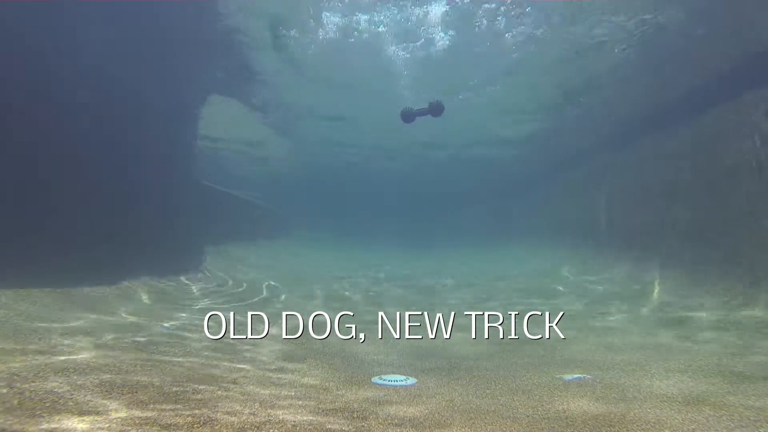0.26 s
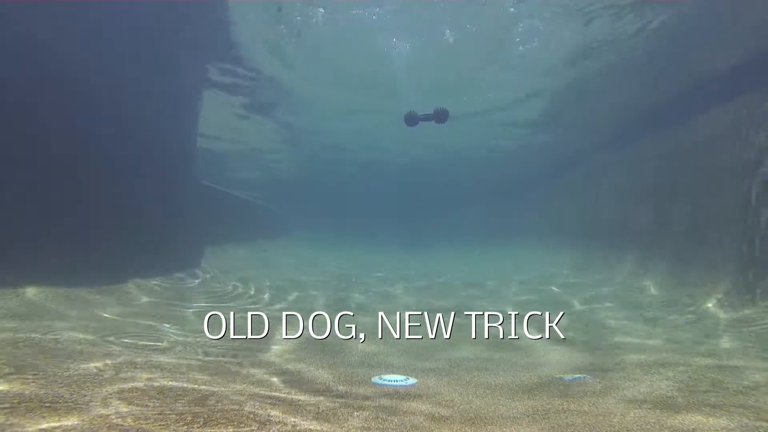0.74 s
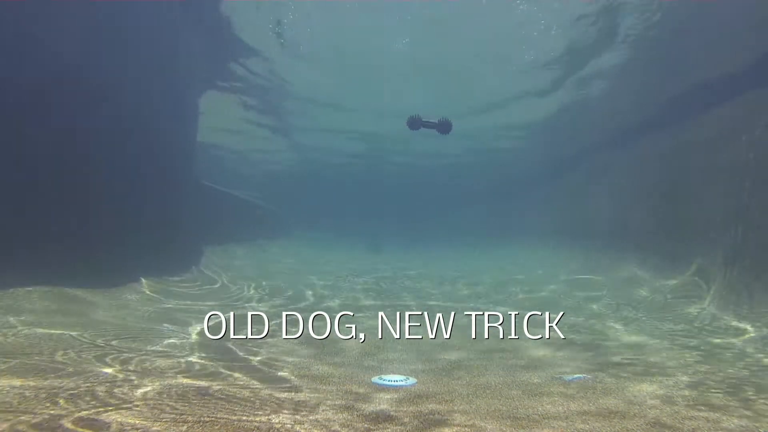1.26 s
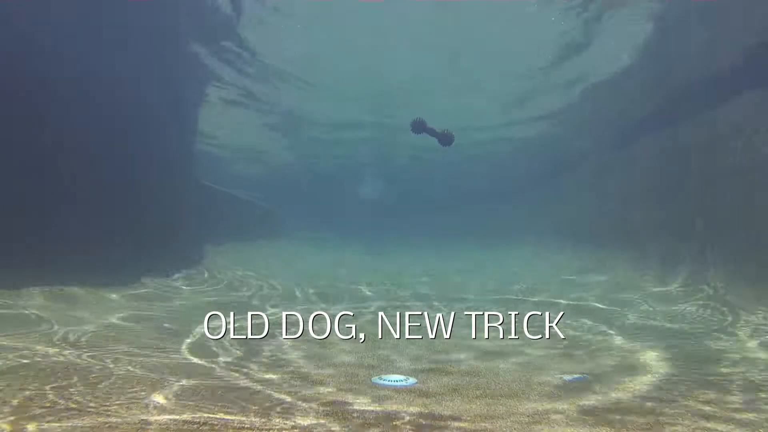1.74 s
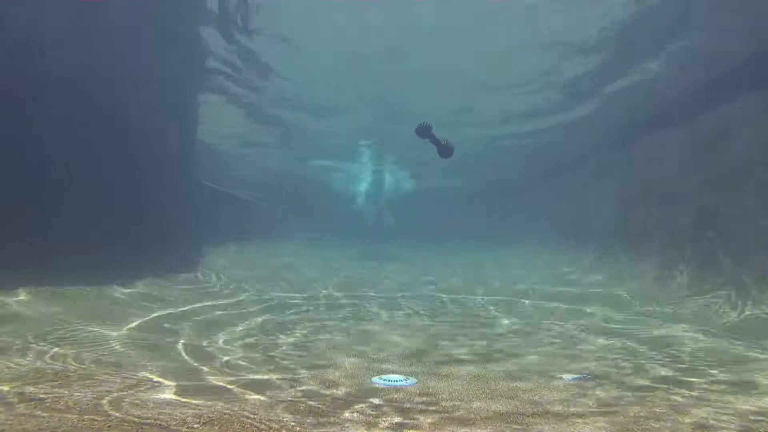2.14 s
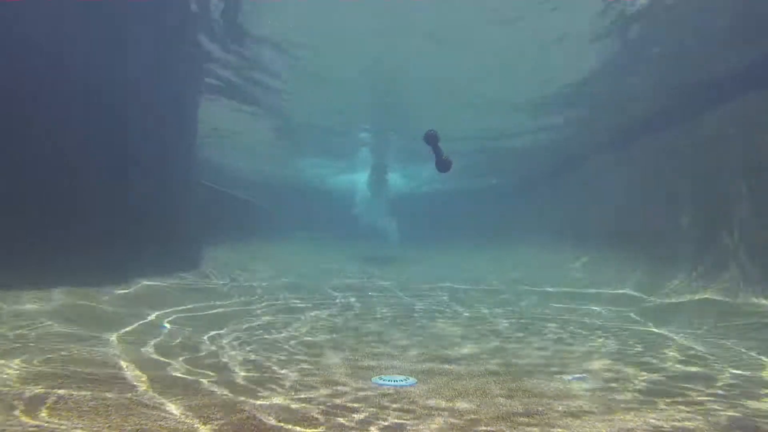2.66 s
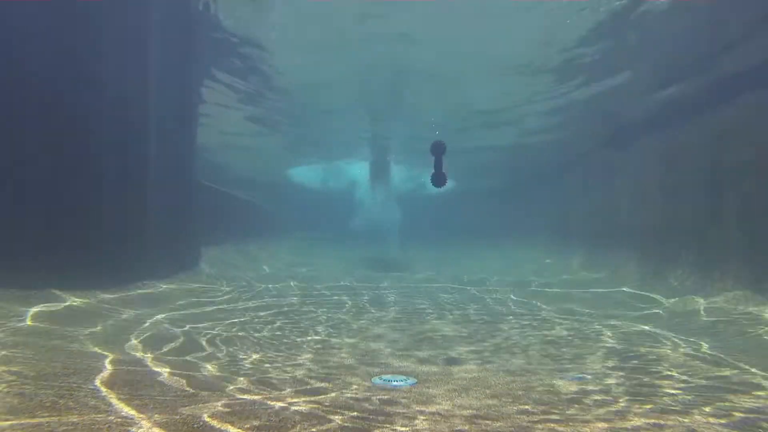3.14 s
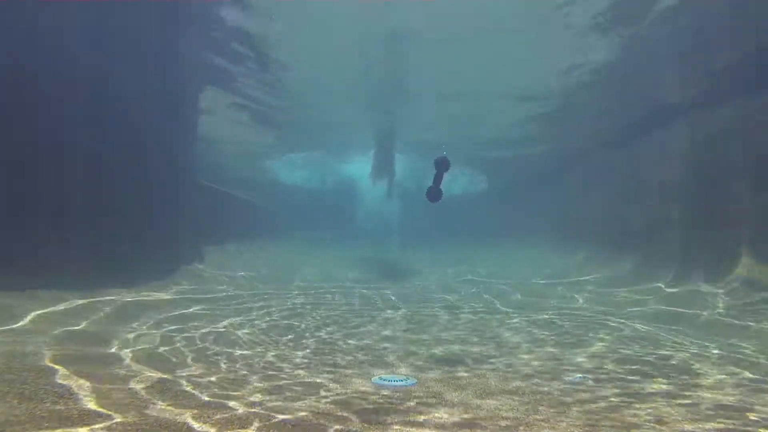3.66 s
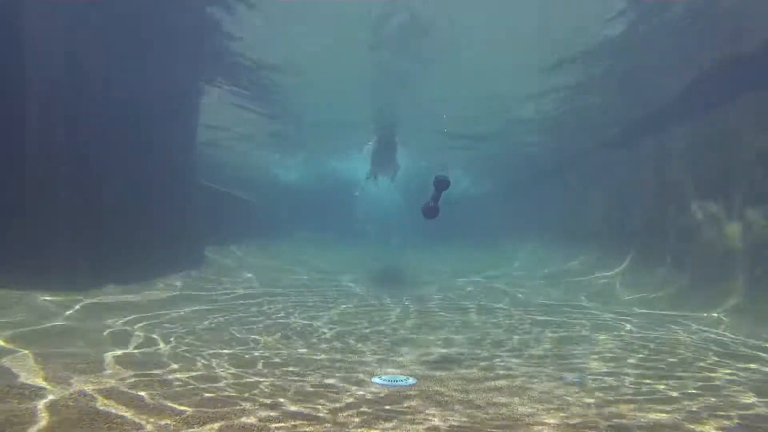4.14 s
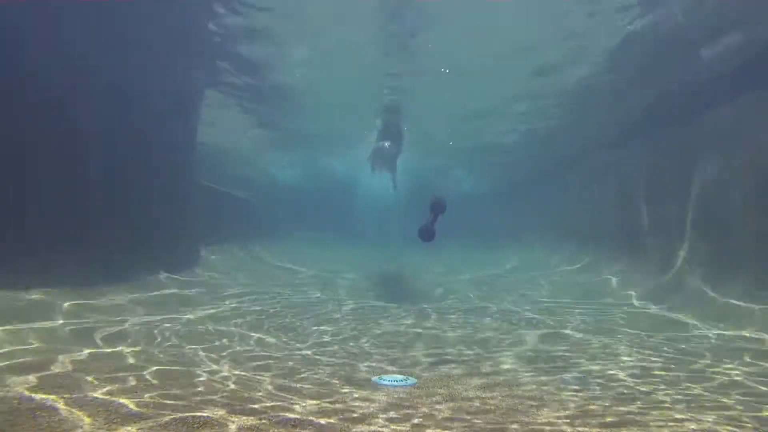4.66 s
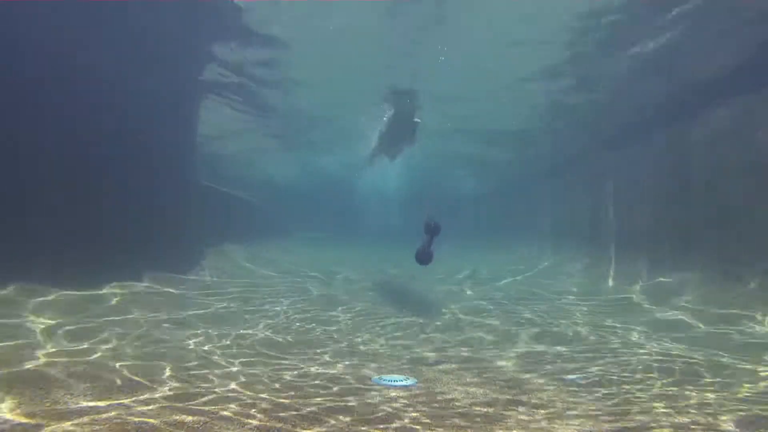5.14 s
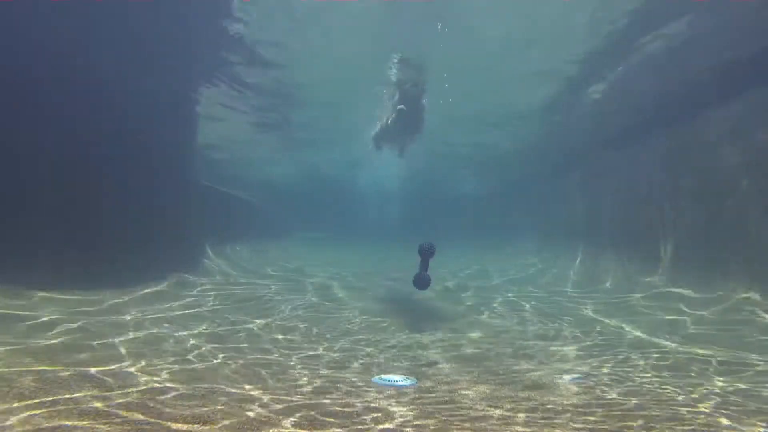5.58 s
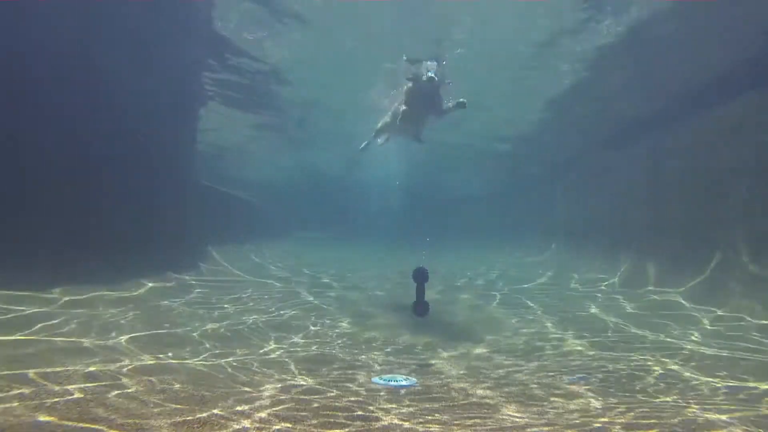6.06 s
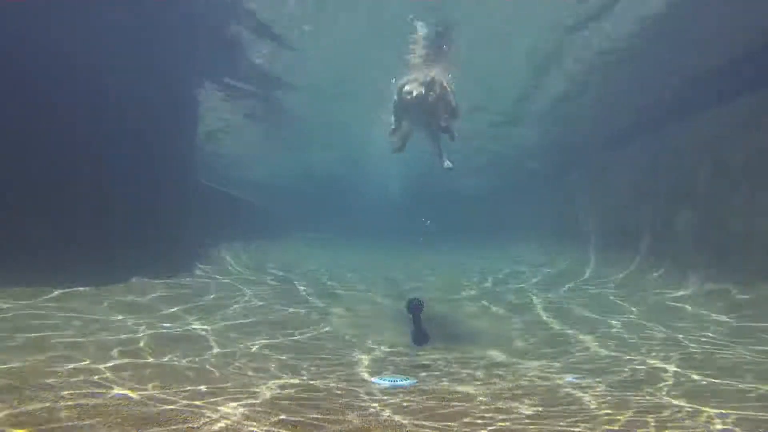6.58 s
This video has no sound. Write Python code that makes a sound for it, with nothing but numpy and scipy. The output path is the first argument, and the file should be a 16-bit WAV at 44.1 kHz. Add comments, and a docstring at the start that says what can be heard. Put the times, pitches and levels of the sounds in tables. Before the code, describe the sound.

Heard from a sealed case on the bottom of a pool, the water sounds boxy and dull. Brief bubbling from a thrown toy dies away, then a dog plunges in, raising a thumping, fizzing cloud of bubbles with loud glugs and crisp clicks. Paddling strokes swish and grow weaker, and a quick run of glugs comes near the end, over a faint low murmur and hiss.

```python
"""Dog in a pool, from underwater

The wake of a thrown toy fades, then a dog jumps in at the far end and paddles closer. The plunge drags
down a cloud of bubbles that seethes and thins out; paws and escaping air make single glugs and snaps.
We listen from a sealed case on the pool floor: its walls ring near 600 and 1700 Hz and dull the treble."""
import sys
import numpy as np
from scipy import signal
from scipy.fft import rfft, irfft
from scipy.io import wavfile
from scipy.ndimage import uniform_filter1d

SR = 44100
rng = np.random.default_rng(int(sys.argv[2]) if len(sys.argv) > 2 else 0)


def wav_record(signal):
    """Record a signal, one row per channel, as 16-bit PCM in the file named by sys.argv[1]."""
    frames = np.transpose(np.atleast_2d(signal))
    bounded = np.clip(frames, -1, 1)
    # unit amplitude maps onto the largest positive 16-bit level
    quanta = np.round(bounded * 32767).astype(np.int16)
    wavfile.write(sys.argv[1], SR, quanta)


N = 300321
TIME = np.arange(N) / SR
AGE = np.arange(SR // 3) / SR   # seconds into a one-shot
GRID_HZ = np.maximum(np.fft.rfftfreq(4096, 1 / SR), 1)

# Levels are pre-mix; glug, gulp and snap pitches and decays are nominal, tuned where they are played.
# tone of the quiet bed: freq_hz, gain_db
BED_EQ = [(20, 5.5), (45, 8.5), (100, -0.5), (200, -6), (400, -10.5), (1000, -16), (1400, -17),
          (2400, -20.5), (4200, -24), (7000, -29), (9800, -32.5), (11700, -32.5), (13000, -27),
          (15300, -35)]
# humps and notches in the bed: centre_hz, half_width_hz, gain_db
BED_BELLS = [(605, 240, 8.5), (1660, 88, -48), (3250, 204, 12), (5246, 186, 10.5), (8140, 270, -2)]
# whine of the electronics: pitch_hz, level_db
WHINE_TONES = [(10645, -80), (10693, -88), (10741, -93), (13187, -88)]
# water being shoved aside: time_s, level_db
SURGE_LEVELS = [(0, -44), (.55, -67), (1.05, -61.5), (1.35, -53), (1.65, -52), (2.25, -40.5), (2.55, -51),
                (3.1, -62), (6.81, -67.5)]
# what the case lets through between its resonances: freq_hz, gain_db
CASE_EQ = [(100, 0.5), (400, -14.5), (950, -28.5), (1400, -23.5), (2000, -19.5), (3300, -35), (4000, -34),
           (7000, -43), (11000, -44.5), (15000, -71)]
# resonances of the case: centre_hz, half_width_hz, gain_db
CASE_BELLS = [(600, 149, 21.5), (807.4, 143, 14), (1123, 233, 16), (1685.4, 209, 20), (2324, 230, 11.5),
              (2822, 297, 13.5), (3400, 322, 14), (4900, 900, -5), (4840, 780, 10.5), (6200, 280, 4.5),
              (8100, 410, 9), (13300, 1200, 15)]
# bubble size, torn fine by the plunge and merging later: time_s, coarseness (under 1 fine, over 1 coarse)
COARSENESS = [(0, 2.35), (1.76, 0.2), (2.65, 0.79), (4.6, 1.9), (6.81, 1.12)]
# spurts of tiny bubbles: start_s, level_db, centre_hz, decay_s
SNAP_HITS = [(0.0152, -35, 1740, 0.031), (0.087, -25, 1810, 0.033), (0.092, -36, 2730, 0.092),
             (.165, -45, 1040, 0.1), (0.214, -48.5, 2800, 0.11), (.272, -58, 4800, 0.062),
             (0.331, -41, 1190, 0.039), (1.035, -44, 1430, 0.061), (1.28, -38, 1410, 0.06),
             (1.5563, -47.5, 4500, 0.064), (1.692, -43, 3570, 0.13), (1.748, -36.5, 3040, 0.028),
             (1.748, -55, 7000, .04), (2.3041, -31.5, 2140, 0.12), (2.6305, -31, 1680, .05),
             (2.7112, -22, 1700, 0.049), (2.7351, -23, 2180, .018), (2.7738, -33, 1950, .02),
             (3.1408, -30.5, 1640, 0.068), (3.3476, -25.5, 1590, 0.019), (3.644, -24.5, 1690, 0.015),
             (3.711, -27.5, 1660, 0.056), (4.13, -37, 1560, 0.077), (4.186, -37, 1700, 0.08),
             (4.318, -34, 1620, 0.054), (4.631, -38.5, 1580, 0.046), (4.96, -46, 3400, 0.075),
             (5.37, -43.5, 3070, 0.031), (5.585, -57, 5600, .03), (5.6584, -33, 2400, 0.034),
             (6.168, -46.5, 1020, .1), (6.533, -35, 1860, 0.071)]
# single large bubbles: start_s, level_db, pitch_hz, decay_s, knock_db (relative to the bubble)
GLUG_HITS = [(0.089, -36, 490, .022, -17), (0.2805, -37, 570, 0.061, -9), (0.3289, -35.5, 592, 0.041, -10),
             (.3932, -43.5, 580, .058, -11), (0.4156, -40.5, 566, .05, -6.5),
             (.4424, -46.5, 603, 0.063, -16), (0.5427, -47.5, 570, 0.038, -4), (.556, -39, 565, 0.036, -14),
             (0.6682, -45, 577, 0.068, -10.5), (0.7225, -43.5, 570, 0.032, -14.5),
             (.9596, -51.5, 650, 0.13, -2.5), (1.0386, -37.5, 640, 0.016, -20),
             (1.2774, -28, 573, 0.04, -11.5), (1.3648, -37, 575, .04, -13), (1.492, -47, 600, .05, -25),
             (1.5136, -41, 605, 0.037, -10.5), (1.8931, -33.5, 757, 0.085, -37),
             (2.111, -28, 715, 0.02, -19), (2.165, -32, 680, 0.11, -31), (2.3016, -24, 607, .13, -21),
             (2.3331, -25, 537, 0.019, -35), (2.5554, -21, 627, 0.016, -28),
             (2.648, -22, 690, 0.024, -24.5), (2.795, -29.5, 612, 0.085, -24),
             (2.9851, -31, 607, 0.02, -22), (3.0901, -32, 630, 0.023, -26),
             (3.1354, -32.5, 627, 0.037, -27), (3.1879, -30, 622, 0.039, -25),
             (3.2551, -37, 615, 0.16, -30), (3.3504, -36.5, 537, 0.078, -21),
             (3.4254, -39.5, 575, 0.043, -15), (3.4568, -34.5, 573, 0.081, -31),
             (3.6406, -33, 610, .035, -30), (3.9195, -33, 600, 0.031, -17), (4.1157, -36, 486, 0.072, -18),
             (4.1316, -32, 532, 0.039, -21), (4.1845, -43, 486, 0.098, -24), (4.3068, -39, 560, 0.078, -33),
             (4.42, -43, 623, 0.053, -36), (4.591, -38, 508, 0.14, -28), (4.6296, -46.5, 614, 0.32, -22),
             (4.8903, -45.5, 620, 0.057, -18), (5.015, -41.5, 593, 0.066, -26),
             (5.016, -45.5, 451, 0.18, -28), (5.3807, -48.5, 520, 0.042, -19),
             (5.4608, -44, 600, 0.035, -20), (5.67, -38, 650, 0.018, -25), (6.1393, -39, 600, 0.0085, -13),
             (6.4178, -36, 626, 0.019, -15), (6.4396, -39, 567, 0.082, -33), (6.5341, -33.5, 472, 0.1, -28),
             (6.5342, -39, 641, 0.079, -27), (6.6546, -39, 542, 0.13, -13)]
# hollow ring of the knocked case: pitch_hz, level_db, t60_s
KNOCK_RING = [(150, -1, 0.071), (263.4, 3.5, 0.056), (357, 7, 0.029), (1013, -7.5, 0.08),
              (1183, -12, 0.055), (1620, -8, 0.058), (2700, -14, 0.031), (3340, -14, 0.047)]
# big air pockets closing: start_s, level_db, pitch_hz, t60_s
POCKET_HITS = [(0.19, -39, 192, 0.08), (.209, -30, 61.4, 0.19), (1.529, -46, 150, .09),
               (1.744, -34, 221, 0.066), (1.753, -32, 65.3, 0.11), (1.922, -30, 69.6, .19),
               (1.972, -32, 99, 0.13), (2.121, -34, 167, 0.204), (2.132, -26.5, 58, 0.2),
               (2.196, -28.5, 75, .3), (2.331, -35.5, 63, 0.3), (2.801, -43, 202, .23)]
# sloshes of take-off and paddling: peak_s, length_s, medium_bubbles_db, small_bubbles_db, spray_db
SLOSHES = [(1.55, 0.069, -49.5, -70, -73), (1.67, 0.15, -76, -56.5, -64), (2.782, 0.43, -34.5, -40, -57),
           (3.218, 0.27, -41, -43.5, -59), (3.587, 0.54, -41, -45, -59), (4.069, 0.45, -58.5, -46.5, -59),
           (4.395, 0.28, -66, -51.5, -82), (4.55, 0.3, -82, -68, -60.5), (4.954, 0.43, -73, -51.5, -61.5),
           (5.357, 0.26, -82, -55, -63), (5.687, 0.25, -52, -51.5, -67.5), (5.899, 0.13, -64, -54.5, -67),
           (6.196, 0.22, -54, -56, -72), (6.637, 0.19, -65, -66, -70.5)]

STRAY_LARGE_DB, STRAY_MEDIUM_DB, STRAY_SMALL_DB, STRAY_FOAM_DB = -67, -75.5, -81, -80   # in calm water
NECK_S = 0.0017   # time constant of a bubble's closing neck
ENTRY_S, FULLEST_S, SETTLE_S = 1.683, 2.33, 0.17   # dog lands; cloud peaks; time constant of the froth


def from_db(db):
    return 10 ** (np.asarray(db) / 20)


def unit_rms(x):
    return x / np.sqrt(np.mean(x ** 2) + 1e-20)


def sum_db(*amplitudes):
    """Level in dB of unrelated sounds heard at once."""
    return 10 * np.log10(sum(amplitude ** 2 for amplitude in amplitudes) + 1e-12)


def automation(points):
    """A breakpoint curve at every sample."""
    return np.interp(TIME, *np.transpose(points))


def add(out, start_s, sound):
    start = max(round(start_s * SR), 0)
    out[start:start + len(sound)] += sound[:max(N - start, 0)]


def band(x, low_hz, high_hz, order=2):
    return signal.sosfilt(signal.butter(order, [low_hz, high_hz], "band", fs=SR, output="sos"), x)


def drift(per_s):
    """Random wander of unit RMS, with per_s breakpoints a second."""
    steps = rng.standard_normal(2000)
    return unit_rms(np.interp(TIME * per_s, np.arange(len(steps)), steps))


def eq_impulse(curve, bells=()):
    """Minimum-phase impulse response of an EQ curve with bells on top."""
    hz, db = np.transpose(curve)
    curve_db = np.interp(np.log(GRID_HZ), np.log(hz), db)
    for centre_hz, half_width_hz, gain_db in bells:
        curve_db += gain_db * np.exp(-((GRID_HZ - centre_hz) / half_width_hz) ** 2)
    cepstrum = irfft(np.log(from_db(curve_db)))
    half = len(cepstrum) // 2
    causal = np.r_[cepstrum[0], 2 * cepstrum[1:half], np.zeros(half)]
    return irfft(np.exp(rfft(causal)))


def through(x, impulse):
    return signal.oaconvolve(x, impulse)[:len(x)]


def swell(rise_s, t60_s):
    """Rounded attack and exponential decay, peaking at 1."""
    shape = (1 - np.exp(-(AGE / rise_s) ** 2)) * np.exp(-np.log(1000) * AGE / t60_s)
    return shape / shape.max()


def pool_reverb(x, t60_s, wet_db):
    """Sound is fast in water: the echoes of walls and surface merge into a short tail."""
    tail = rng.standard_normal(len(AGE)) * swell(0.0069, t60_s)
    return x + from_db(wet_db) * through(x, tail / np.sqrt(np.sum(tail ** 2)))


def bed():
    """Steady murmur and hiss, with a thin electronic whine."""
    murmur = unit_rms(through(rng.standard_normal(N), eq_impulse(BED_EQ, BED_BELLS)))
    whine = sum(from_db(db) * np.sqrt(2) * np.sin(2 * np.pi * hz * TIME + 0.52 * drift(8.9))
                for hz, db in WHINE_TONES)
    return from_db(-58) * murmur + whine


def surge():
    """Displaced water swings the pressure: a lumpy rumble."""
    colour = eq_impulse([(15, 10), (30, -10), (48, -26.5), (75, -1.5), (115, -13.5), (170, -10.5),
                         (300, -13), (450, -23.5), (900, -58)])   # freq_hz, gain_db
    level_db = automation(SURGE_LEVELS) + 2 + 3.3 * drift(17)
    return from_db(level_db) * unit_rms(through(rng.standard_normal(N), colour))


def toy_wake(db, fade_db_per_s):
    """Envelope of the bubbles dying away behind the thrown toy."""
    return from_db(db - fade_db_per_s * TIME)


def swarm(level_db, case, low_hz, high_hz, per_s, cycles, spread_db, coarseness=1, sizes=47):
    """Bubbles are born in clumps and ring down 60 dB in `cycles` periods; louder means denser."""
    rate = np.clip(per_s * from_db(1.5 * (level_db + 50)), per_s / 3.5, SR / 6)   # per_s at -50 dB
    born = rng.random(N) < rate * from_db(2.5 * drift(45)) / SR
    strengths = from_db(spread_db * np.minimum(rng.exponential(1, N), 3)) * rng.choice([-1, 1], N)
    kicks = born * strengths / np.sqrt(rate)
    pitch_slot = (sizes * rng.random(N) ** coarseness).astype(int)   # coarse bubbles ring low
    rings = np.zeros(N)
    for slot, hz in enumerate(np.geomspace(low_hz, high_hz, sizes)):
        radius = np.exp(-np.log(1000) * hz / (cycles * SR))
        poles = [1, -2 * radius * np.cos(2 * np.pi * hz / SR), radius ** 2]
        rings += signal.lfilter([hz, 0, -hz], poles, kicks * (pitch_slot == slot) + 1e-18)
    rings = unit_rms(through(rings, case))
    # the air is spent evenly: a large bubble leaves less for its neighbours
    local_power = uniform_filter1d(rings ** 2, int(0.07 * SR))
    return from_db(level_db) * rings / np.sqrt(local_power + 0.079)


def cloud(case, medium_strokes, small_strokes):
    """Three sizes of bubbles seethe over the smooth rush of those too far off to tell apart."""
    coarseness = automation(COARSENESS)
    spill = from_db(-10) * medium_strokes   # strokes also stir the large bubbles and the rush
    large_db = sum_db(toy_wake(db=-45.5, fade_db_per_s=65), spill, from_db(STRAY_LARGE_DB),
                      plunge(db=-32, attack_s=0.19, grow_db_per_s=7, settle_db=3, fade_db_per_s=9))
    medium_db = sum_db(
        toy_wake(db=-49, fade_db_per_s=62), medium_strokes, from_db(STRAY_MEDIUM_DB),
        plunge(db=-39, attack_s=0.048, grow_db_per_s=8.5, settle_db=13, fade_db_per_s=5.5))
    small_db = sum_db(
        toy_wake(db=-52.5, fade_db_per_s=50), small_strokes, from_db(STRAY_SMALL_DB),
        plunge(db=-40.5, attack_s=0.0097, grow_db_per_s=10.5, settle_db=5.5, fade_db_per_s=18.5))
    rush_db = sum_db(toy_wake(db=-50.5, fade_db_per_s=80), spill,
                     plunge(db=-38, attack_s=0.013, grow_db_per_s=16, settle_db=10, fade_db_per_s=7.5))
    large = swarm(large_db, case, 467, 839, per_s=260, cycles=27.4, spread_db=5, coarseness=coarseness)
    medium = swarm(medium_db, case, 1505, 2068, per_s=400, cycles=79, spread_db=6, coarseness=coarseness)
    small = swarm(small_db, case, 2136, 4520, per_s=850, cycles=89, spread_db=4)
    rush = unit_rms(through(band(rng.standard_normal(N), 746, 3400, order=3), case))
    return large + medium + pool_reverb(small, t60_s=0.18, wet_db=-13) + from_db(rush_db) * rush


def spray(case, strokes):
    """Foam fizzes and drops patter on the surface."""
    level_db = sum_db(
        toy_wake(db=-62, fade_db_per_s=34), strokes, from_db(STRAY_FOAM_DB),
        plunge(db=-55.5, attack_s=0.0042, grow_db_per_s=1.5, settle_db=2.5, fade_db_per_s=10))
    fizz = swarm(level_db - 3.5, case, 3924, 7250, per_s=1500, cycles=170, spread_db=2.5)
    ticks = swarm(level_db - 11, case, 5300, 15600, per_s=1700, cycles=57, spread_db=7)
    hiss = unit_rms(through(band(rng.standard_normal(N), 4560, 14000), case))
    return fizz + ticks + from_db(level_db) * hiss


def snaps(case):
    """A spurt of tiny bubbles gives the case a short, crisp rattle."""
    out = np.zeros(N)
    for start_s, db, hz, decay_s in SNAP_HITS:
        spurt = band(rng.standard_normal(len(AGE)), hz * 0.84, hz * 1.284)
        envelope = swell(0.00028, decay_s * 1.49)
        burst = through(spurt * envelope, case)
        makeup_gain = np.sqrt(np.sum(envelope ** 2) / np.sum(burst ** 2))
        add(out, start_s, from_db(db - 8) * makeup_gain * burst)
    return out


def bubble(hz, rise_s, t60_s, glide=0, scoop=0):
    """A damped tone: scoop bends it up as the neck closes, positive glide as it nears the surface."""
    lag_s = scoop * NECK_S * (1 - np.exp(-AGE / NECK_S))
    bent_age = AGE * (1 + glide * (AGE - 2 * rise_s)) - lag_s
    return swell(rise_s, t60_s) * np.sin(2 * np.pi * hz * bent_age)


def glugs(hits):
    """A bubble pinches off with a push that knocks on the case, then rings; the surface echoes it."""
    out = np.zeros(N)
    for start_s, db, hz, decay_s, knock_db in hits:
        glide = rng.normal(0.4, 0.92)
        echo_s = rng.normal(0.00898, 0.00206)
        jitters = rng.standard_normal(len(KNOCK_RING))
        tone = bubble(hz * 1.03, rise_s=0.0029, t60_s=decay_s * 0.76, glide=glide, scoop=0.21)
        push = bubble(hz * 0.23, rise_s=0.0024, t60_s=0.023)
        knock = sum(from_db(mode_db + 2 * jitter)
                    * bubble(mode_hz * (1 + 0.045 * jitter), rise_s=0.0011, t60_s=t60_s)
                    for (mode_hz, mode_db, t60_s), jitter in zip(KNOCK_RING, jitters))
        add(out, start_s, from_db(db) * (tone + from_db(-37.5) * push + from_db(knock_db - 5.5) * knock))
        add(out, start_s + echo_s, from_db(db - 7) * tone)
    return out


def pockets():
    """Large cavities wobble slowly: dull thumps that sag in pitch."""
    out = np.zeros(N)
    for start_s, db, hz, t60_s in POCKET_HITS:
        add(out, start_s, from_db(db) * bubble(hz, rise_s=0.0012, t60_s=t60_s, glide=-0.24))
    return out


def paddling(edge_db=-11.5, rise_share=0.42):
    """Each stroke swells and ebbs: envelopes for medium bubbles, small bubbles and spray."""
    power = np.zeros((3, N))
    for peak_s, length_s, *levels_db in SLOSHES:
        phase = (TIME - peak_s) / length_s
        from_peak = np.maximum(-phase / rise_share, phase / (1 - rise_share))   # 1 at either edge
        envelope = from_db(edge_db * np.minimum(from_peak, 10))
        power += np.outer(from_db(levels_db), envelope) ** 2
    return np.sqrt(power)


def plunge(db, attack_s, grow_db_per_s, settle_db, fade_db_per_s):
    """Envelope of the air the dog drags down: it builds, the froth settles, the rest rises out slowly."""
    attack = 1 - np.exp(-np.maximum(TIME - ENTRY_S, 0) / attack_s)
    before_s, after_s = np.maximum(FULLEST_S - TIME, 0), np.maximum(TIME - FULLEST_S, 0)
    settled = 1 - np.exp(-(after_s / SETTLE_S) ** 2)
    return attack * from_db(db - grow_db_per_s * before_s - settle_db * settled - fade_db_per_s * after_s)


def gulps(count=8):
    """Air escapes in an even run of glugs, each softer, lower and longer, with a harder knock."""
    # start_s, level_db, pitch_hz, decay_s, knock_db
    first = np.array([5.7486, -33, 596, 0.03, -31.5])
    step = np.array([0.07, -0.64, -11, 0.0046, 3])
    return [first + k * step for k in range(count)]


def scene():
    """Glugs and snaps echo up front; thumps, cloud, spray and surge lie around them. Mono."""
    case = eq_impulse(CASE_EQ, CASE_BELLS)
    medium_strokes, small_strokes, spray_strokes = paddling()
    hits = from_db(5.5) * (glugs(GLUG_HITS + gulps()) + snaps(case))
    foreground = pool_reverb(hits, t60_s=0.3, wet_db=-21)
    thumps = from_db(-1.5) * pockets()
    froth = cloud(case, medium_strokes, small_strokes) + spray(case, spray_strokes)
    return (foreground + thumps + froth + surge() + bed())[None]


def record(dry):
    """A low cut at 20 Hz and a steep high cut at 15350 Hz."""
    low_cut = signal.butter(2, 20, "high", fs=SR, output="sos")
    high_cut = signal.ellip(10, 0.2, 70, 15350, fs=SR, output="sos")
    return signal.sosfilt(high_cut, signal.sosfilt(low_cut, dry))


dry = scene()
out = record(dry)
wav_record(out)
```